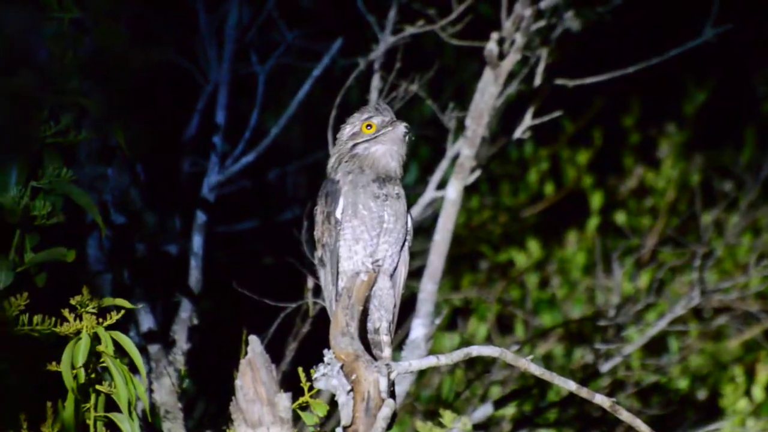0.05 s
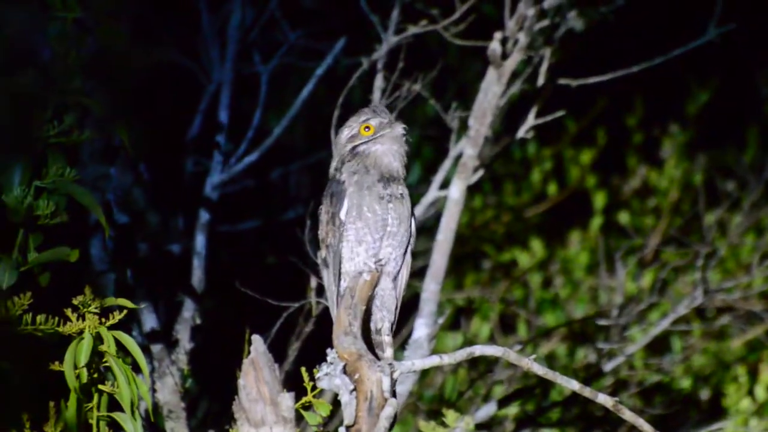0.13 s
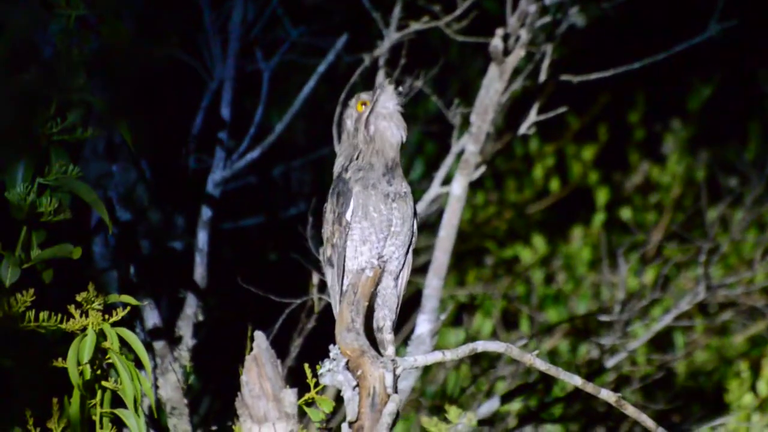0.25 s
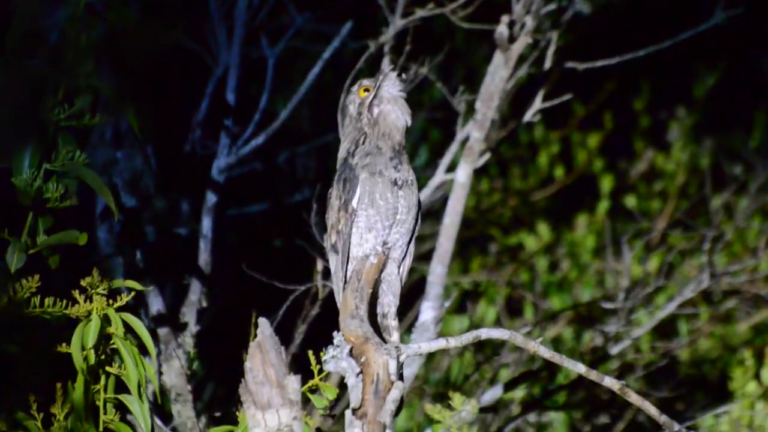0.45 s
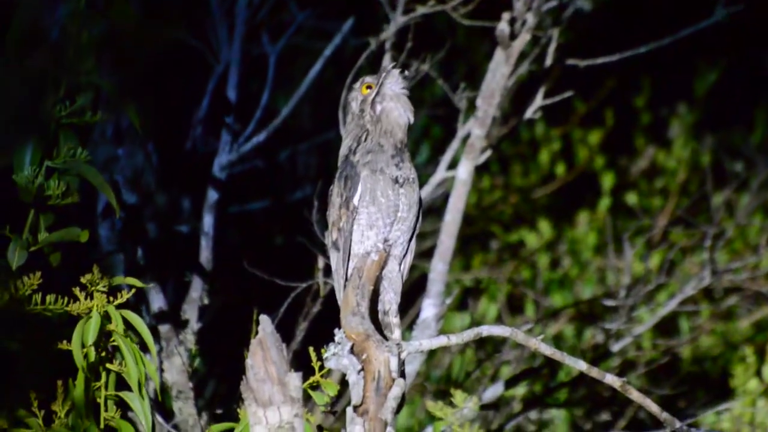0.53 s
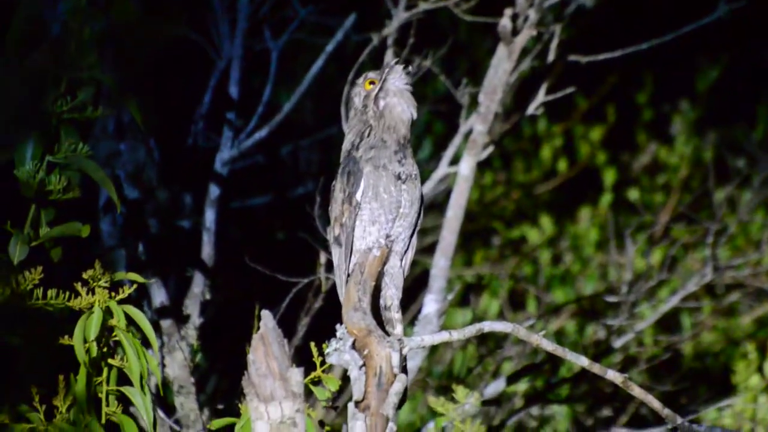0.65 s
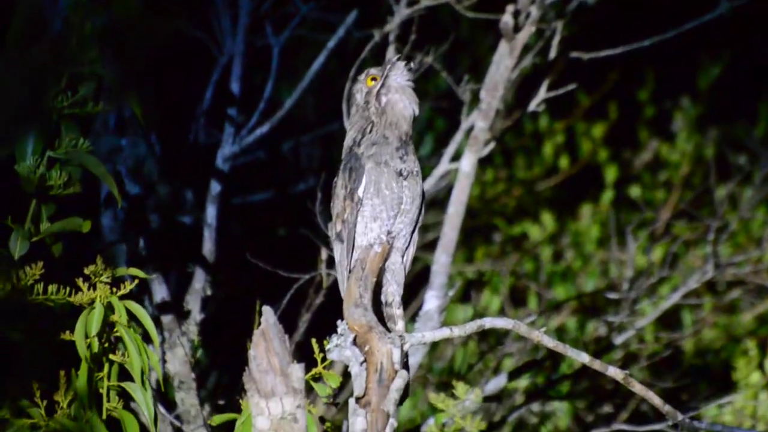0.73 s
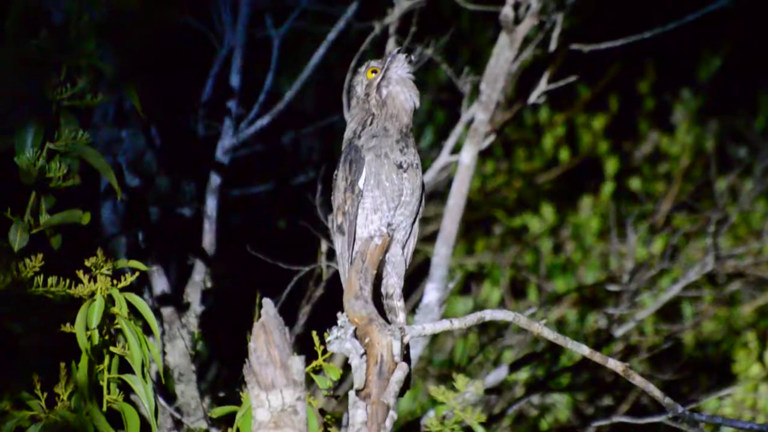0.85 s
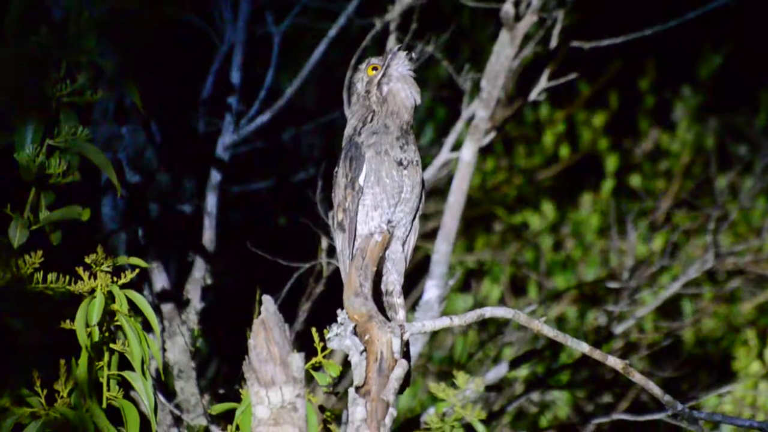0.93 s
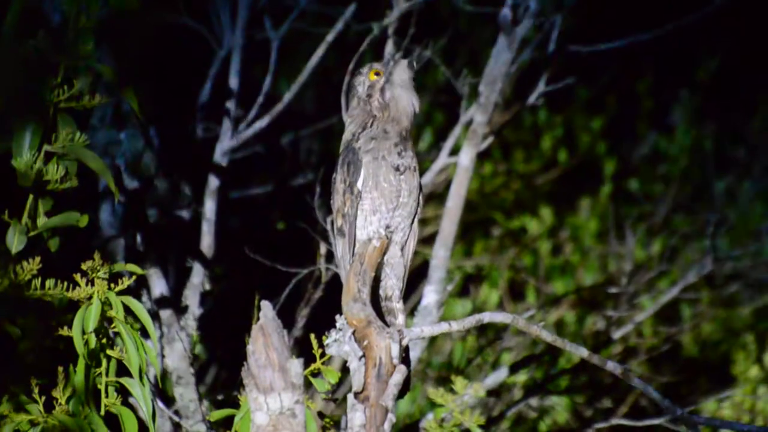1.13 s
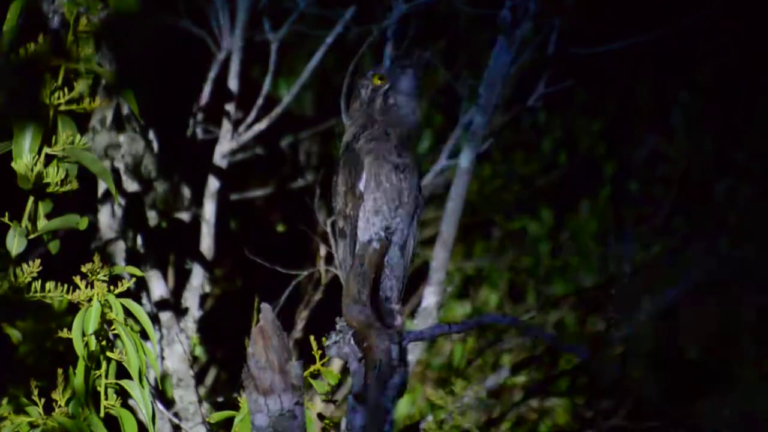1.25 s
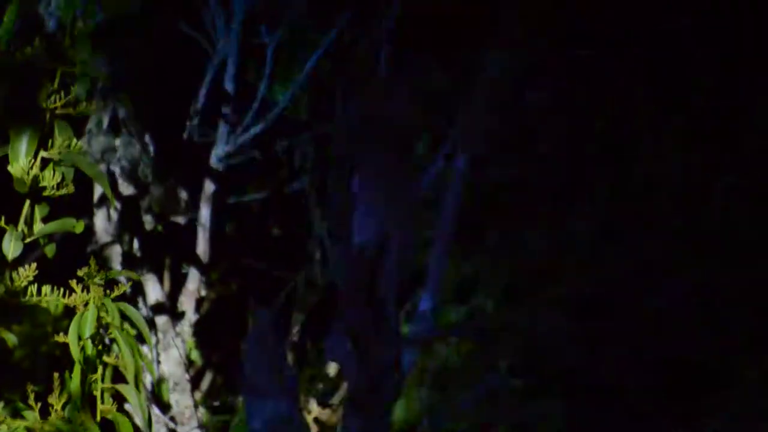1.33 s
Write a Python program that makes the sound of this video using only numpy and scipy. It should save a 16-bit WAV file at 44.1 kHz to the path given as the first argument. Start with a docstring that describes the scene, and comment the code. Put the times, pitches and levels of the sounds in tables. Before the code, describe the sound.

One clear arching bird whistle swells in a dark clearing, with camera clicks and soft insects.

```python
"""A potoo's long whistle, a nearly pure gliding sine, rings in a night clearing; the trees return it faintly.
Crickets and a distant frog chorus pulse as wavering tones and fluttering noise bands.
Under them lie a hush of patchy noise, a faint low drone and brief soft rustles.
An abrupt click of filtered noise comes as the sound begins; then the handled camera gives plastic clicks
made the same way and a thin gliding squeak, and its electronics whine very high."""
import sys
import numpy as np
from scipy import signal
from scipy.fft import rfft, irfft
from scipy.io import wavfile
from scipy.ndimage import uniform_filter1d

SR = 44100
rng = np.random.default_rng(int(sys.argv[2]) if len(sys.argv) > 2 else 0)


def store_pcm(level_fs):
    """Save levels as 16-bit WAV."""
    pcm = np.round(np.clip(level_fs, -1, 1) * 32767).astype(np.int16)
    wavfile.write(sys.argv[1], SR, np.atleast_2d(pcm).T)


N = 61739
T = np.arange(N) / SR  # time in seconds

# night callers: f/Hz, width/Hz, level/dB, middle of a chirp t/s, period/s, chirp length/s
NIGHT_CALLERS = [(3458, 30, -61, .008, .158, .04), (3445, 30, -62, .052, .158, .04),
                 (2122, 12, -63.5, .185, .193, .125), (2720, 110, -66, .03, .036, .03),
                 (5700, 100, -78, .1, .172, .07), (10900, 200, -86, .17, .14, .08)]
# distant chorus bands: f/Hz, width/Hz, level/dB
CHORUS_BANDS = [(485, 27, -69), (2038, 270, -67), (2720, 190, -68.5), (3386, 120, -70), (3594, 180, -75),
                (4034, 100, -77), (7510, 170, -91)]
CHIRP_FLUTTER_DB, CHORUS_FLUTTER_DB = 1.2, 2.5  # rms

# colour of the night air: f/Hz, relative level/dB
AIR_SPECTRUM = [(20, -23.5), (45, -13), (80, -4), (135, 1.5), (200, -3), (300, -4.5), (520, 2), (800, -1.5),
                (1400, -4.5), (1900, -5.5), (2450, -11), (3100, -6.5), (3800, -10.5), (4400, -21.5),
                (5500, -21), (7500, -30.5), (10000, -32.5), (14500, -35.5), (16000, -37)]
AIR_DB, AIR_PATCH_DB = -57.5, .8  # overall level; rms depth of the patches
# distant low drone: f/Hz, width/Hz, level/dB
DRONE_BANDS = [(128, 26, -76), (154, 11, -73)]

# an abrupt click as the sound begins (first row), then the handling clicks (all other rows):
# t/s, body level/dB, snap level/dB, thud level/dB
CLICK_LEVELS = [(.0028, -42, -60, -53), (0.0154, -45.5, -50, -41), (0.0275, -54, -53.5, -57),
                (.0529, -38, -48.5, -54), (0.371, -66, -60.5, -69), (0.3777, -39, -50.5, -39.5),
                (0.4297, -40, -47, -65), (0.439, -60.5, -56.5, -71.5), (0.8072, -69.5, -62.5, -76.5)]
# colour of the short knock: f/Hz, relative level/dB
BODY_SPECTRUM = [(200, -30), (700, -12), (1300, 7.5), (1900, -3.5), (2400, -10.5), (3200, -5.5),
                 (5000, -38), (9000, -44.5)]
# bright snap: f/Hz, relative level/dB
SNAP_SPECTRUM = [(800, -18), (3000, -2), (5000, 3), (7400, -1.5), (9500, -10), (11000, -7.5), (12900, -1),
                 (14000, -9), (14800, -10.5), (16000, -20)]
# low thud: f/Hz, relative level/dB
THUD_SPECTRUM = [(30, -48), (90, -25), (200, 0.5), (450, -7.5), (750, 6), (1100, -3), (2000, -26),
                 (6000, -63)]
BODY_DECAY_S, SNAP_DECAY_S, THUD_DECAY_S = 0.0044, 0.0025, 0.0046
CLICK_RISE_S, CLICK_TAIL_DB, CLICK_TAIL_S = 0.00049, -17.5, 0.03

# arch of the whistle: t/s, f/Hz
WHISTLE_PITCH = [(.18, 985), (.203, 990), (.216, 1052), (.235, 1102), (.29, 1153), (.385, 1190),
                 (.44, 1196), (.52, 1211), (.64, 1205), (.74, 1201), (.9, 1179), (1.06, 1149), (1.13, 1140),
                 (1.23, 1141)]
# swells of the whistle: t/s, level/dB
WHISTLE_LEVEL = [(.18, -61), (.203, -57.5), (.225, -43), (.247, -36), (.292, -40.5), (.345, -36.5),
                 (.37, -35.5), (.435, -35.5), (.465, -32), (.508, -34), (.58, -32), (.655, -32),
                 (.695, -30.5), (.765, -30.5), (.805, -28), (.862, -29), (.882, -29), (.93, -27.6),
                 (.985, -29.5), (1.017, -29.5), (1.052, -31), (1.074, -29.5), (1.132, -34), (1.15, -32.6),
                 (1.229, -33.5)]
# overtones: multiple of the note, then early, middle and late level/dB relative to the note
WHISTLE_OVERTONES = [(2, -34.5, -47, -43), (4, -43, -57.5, -46), (5, -50, -68.5, -41.5)]
# moments of those three overtone levels: t/s
OVERTONE_MOMENTS = [.33, .8, 1.19]
WHISTLE_RISE_S, WHISTLE_END_S, OVERTONE_FADE_S = 0.0033, 1.229, .002
DROP_HZ_PER_S, FLICK_S, FLICK_DB, RELEASE_DB_PER_S = 15000, .0075, 3.2, 3000
JITTER, SHIMMER_DB = .0012, -0.02  # rms pitch drift as a fraction; level drift

# reflections from the ground, a trunk and the forest edge: delay t/s, level/dB
REFLECTIONS = [(.0075, -22), (.0175, -25), (.21, -24.5)]
FOREST_DB, FOREST_T60_S, FOREST_BUILD_S = -29, 2.2, .04
SCATTER_PER_S = 2000  # mean echo density

# soft rustles and murmurs: middle t/s, length/s, f/Hz, width/Hz, level/dB
SOFT_RUSTLES = [(.228, 0.033, 1960, 400, -60.5), (.96, 0.16, 555, 160, -62), (1.165, 0.042, 1540, 200, -58),
                (1.29, 0.099, 7470, 6000, -80), (1.335, 0.03, 382, 70, -58)]

# thin squeak: t/s, f/Hz, level/dB
SQUEAK_GLIDE = [(.403, 6250, -85), (.411, 6150, -71), (.422, 5650, -71), (.433, 5350, -68),
                (.452, 5950, -70), (.472, 6120, -70), (.498, 6130, -71), (.51, 6000, -85)]
SQUEAK_OCTAVE_DB, SQUEAK_FLUTTER_DB = -5.5, 3.5
SQUEAK_JITTER = .011  # rms fraction of the pitch
SHELL_HZ, SHELL_WIDTH_HZ = 12300, 990  # the resonance that lifts the squeak's octave

WHINE_HZ, WHINE_DB, EDGE_HZ = 15686, -79.5, 16100


def amp(db):
    """Decibels to gain."""
    return 10 ** (np.asarray(db) / 20)


def unit(x):
    """Scales to rms 1."""
    return x / np.sqrt(np.mean(abs(x) ** 2) + 1e-20)


def curve(rows, axis=1):
    """Joins one column of a time table by straight lines."""
    rows = np.array(rows)
    return np.interp(T, rows[:, 0], rows[:, axis])


def noise(points):
    """Steady noise with the given spectrum, at rms 1."""
    f, db = np.transpose(points)
    hz = np.fft.rfftfreq(N, 1 / SR)
    gain = amp(np.interp(np.log(hz + 1), np.log(f), db))
    return unit(irfft(rfft(rng.standard_normal(N)) * gain, N))


def band(hz, width):
    """Noise in one steep resonance, at rms 1."""
    f = np.fft.rfftfreq(N, 1 / SR)
    spectrum = rfft(rng.standard_normal(N))
    return unit(irfft(spectrum / (1 + (2 * (f - hz) / width) ** 4), N))


def wander(rate):
    """Random drift of rms 1 up to about the given rate in Hz."""
    return band(0, 2 * rate)


def night_callers():
    """Nearer insects chirp wavering tones at steady rates; the far chorus merges into fluttering bands."""
    out = np.zeros(N)
    for hz, width, db, middle, period, length in NIGHT_CALLERS:
        from_middle = (T - middle + period / 2) % period - period / 2
        chirp = np.cos(np.pi * np.clip(from_middle / length, -.5, .5))
        level = np.sqrt(2) * amp(db + CHIRP_FLUTTER_DB * wander(40))
        pitch = hz + width / 2 * wander(width)
        tone = np.sin(2 * np.pi * np.cumsum(pitch) / SR)
        out += level * chirp * tone
    for hz, width, db in CHORUS_BANDS:
        out += amp(db + CHORUS_FLUTTER_DB * wander(27)) * band(hz, width)
    return out


def night_air():
    """A soft hush of noise whose level drifts in patches of time and frequency."""
    spectrum = signal.stft(noise(AIR_SPECTRUM), nperseg=512)[2]
    grain = rng.standard_normal(spectrum.shape)
    smooth_in_pitch = uniform_filter1d(grain, size=6, axis=0)
    patches = unit(uniform_filter1d(smooth_in_pitch, size=10, axis=1))
    air = signal.istft(spectrum * amp(AIR_PATCH_DB * patches))[1][:N]
    return amp(AIR_DB) * unit(air)


def drone():
    """Narrow bands of noise make a faint, low, wavering drone from far away."""
    return sum(amp(db) * band(hz, width) for hz, width, db in DRONE_BANDS)


def clicks():
    """Each click sums a short knock, a bright snap and a low thud: noise bursts that rise fast and decay."""
    out = np.zeros(N)
    colours = (BODY_SPECTRUM, SNAP_SPECTRUM, THUD_SPECTRUM)
    decays = (BODY_DECAY_S, SNAP_DECAY_S, THUD_DECAY_S)
    for start, *levels in CLICK_LEVELS:
        age = np.maximum(T - start, 0)
        for db, colour, decay_s in zip(levels, colours, decays):
            fade = np.exp(-age / decay_s) + amp(CLICK_TAIL_DB) * np.exp(-age / CLICK_TAIL_S)
            envelope = np.minimum(age / CLICK_RISE_S, 1) * fade
            burst = envelope * noise(colour)
            # every burst carries the energy of its envelope, whatever the noise draw
            out += amp(db) * burst * np.linalg.norm(envelope) / np.linalg.norm(burst)
    return out


def potoo():
    """A near sine that arches in pitch, swells, and ends in a quick downward flick."""
    closing = np.clip(T - WHISTLE_END_S, 0, .04)  # seconds into the flick
    hz = (curve(WHISTLE_PITCH) - DROP_HZ_PER_S * closing) * (1 + JITTER * wander(70))
    phase = 2 * np.pi * np.cumsum(hz) / SR

    swell_db = FLICK_DB * np.sin(np.pi / 2 * np.minimum(closing / FLICK_S, 1)) ** 2
    flick_db = swell_db - RELEASE_DB_PER_S * np.maximum(closing - FLICK_S, 0)
    opening = np.clip((T - WHISTLE_PITCH[0][0]) / WHISTLE_RISE_S, 0, 1)
    level = opening * amp(curve(WHISTLE_LEVEL) + flick_db + SHIMMER_DB * wander(42))

    overtones = np.zeros(N)
    for multiple, *levels in WHISTLE_OVERTONES:
        gain = amp(np.interp(T, OVERTONE_MOMENTS, levels))
        overtones += gain * np.sin(round(multiple) * phase)
    overtones *= np.exp(-closing / OVERTONE_FADE_S)
    return np.sqrt(2) * level * (np.sin(phase) + overtones)


def forest(x):
    """Three single reflections and a faint, slowly building scatter from the trees."""
    near = sum(amp(db) * np.interp(T - delay, T, x, left=0) for delay, db in REFLECTIONS)
    scatter = rng.standard_normal(N) * (rng.random(N) < SCATTER_PER_S / SR)
    scatter *= (1 - np.exp(-T / FOREST_BUILD_S)) * amp(-60 * T / FOREST_T60_S)
    scatter /= np.linalg.norm(scatter)
    return near + amp(FOREST_DB) * signal.fftconvolve(x, scatter)[:N]


def rustles():
    """Bands of noise swell softly and briefly in the dark."""
    out = np.zeros(N)
    for middle, length, hz, width, db in SOFT_RUSTLES:
        swell = np.exp(-(2 * (T - middle) / length) ** 2)
        out += amp(db) * swell * band(hz, width)
    return out


def squeak():
    """A thin unsteady tone that dips and rises again; its octave rings the camera's shell."""
    hz = curve(SQUEAK_GLIDE)
    phase = 2 * np.pi * np.cumsum(hz * (1 + SQUEAK_JITTER * wander(900))) / SR
    sounding = (T > SQUEAK_GLIDE[0][0]) & (T < SQUEAK_GLIDE[-1][0])
    shell = 1 / np.hypot(1, 2 * (2 * hz - SHELL_HZ) / SHELL_WIDTH_HZ)
    octave = amp(SQUEAK_OCTAVE_DB) * shell
    level = sounding * amp(curve(SQUEAK_GLIDE, axis=2) + SQUEAK_FLUTTER_DB * wander(200))
    return level * (np.sin(phase) + octave * np.sin(2 * phase))


def scene():
    """The bird in its forest, the night around it, the clicks and the squeak, mixed to one channel."""
    bird = potoo()
    clearing = bird + forest(bird)
    night = night_callers() + night_air() + drone() + rustles()
    close_sounds = clicks() + squeak()
    return (clearing + night + close_sounds)[None]


def record(dry):
    """The camera's electronics add a faint high whine, and a steep lowpass limits the band."""
    whine = np.sqrt(2) * amp(WHINE_DB) * np.sin(2 * np.pi * WHINE_HZ * T)
    lowpass = signal.firwin(511, EDGE_HZ, window=("kaiser", 9), fs=SR)
    return signal.oaconvolve(dry + whine, lowpass[None], "same")


dry = scene()
out = record(dry)
store_pcm(out)
```